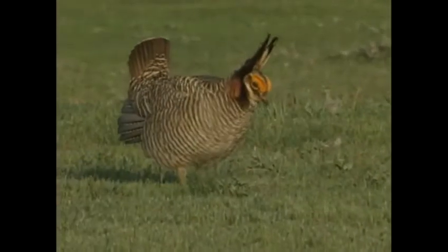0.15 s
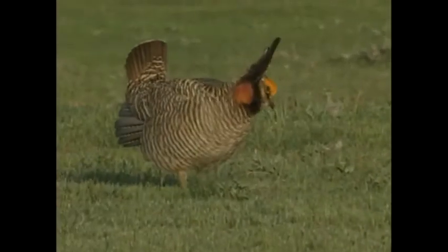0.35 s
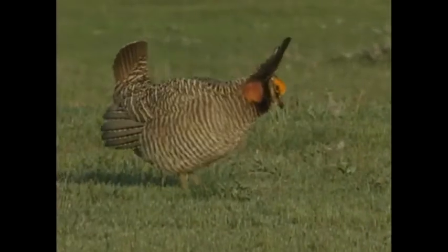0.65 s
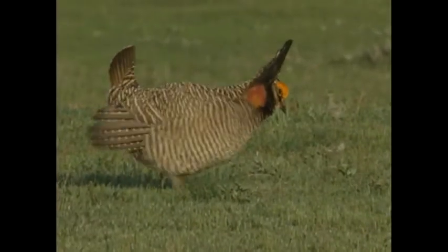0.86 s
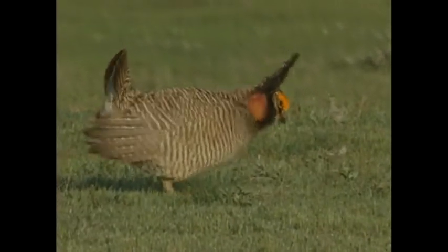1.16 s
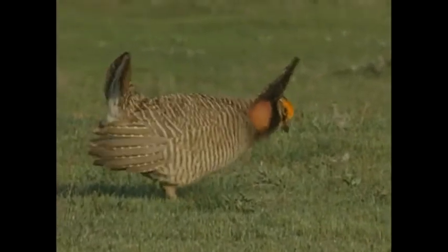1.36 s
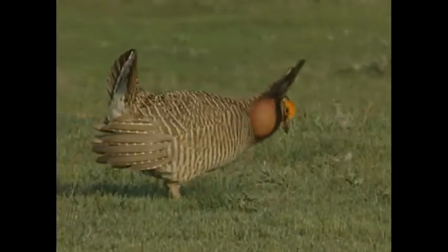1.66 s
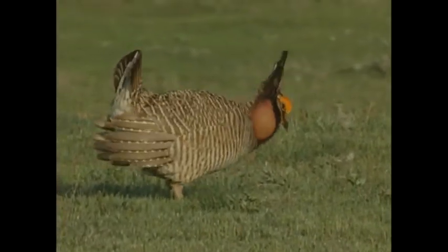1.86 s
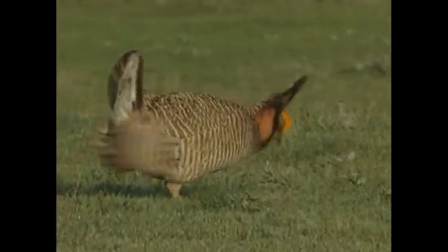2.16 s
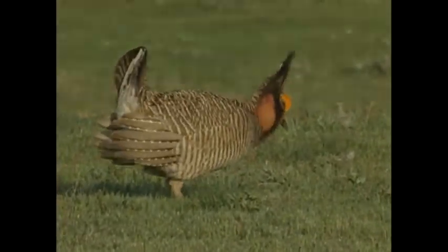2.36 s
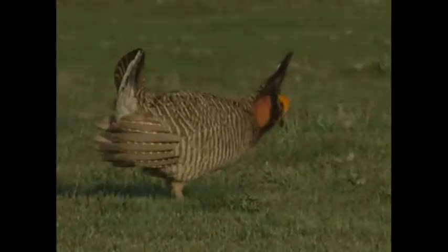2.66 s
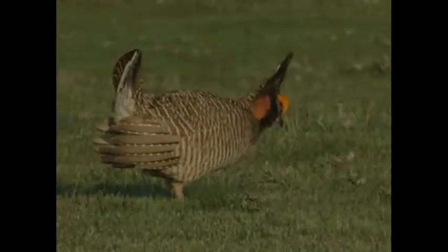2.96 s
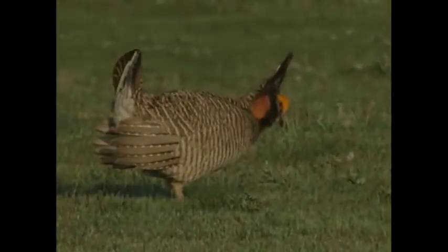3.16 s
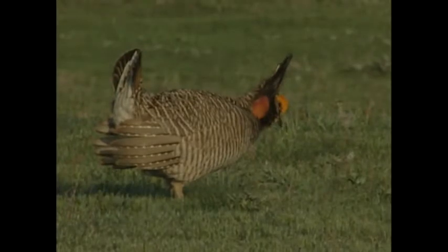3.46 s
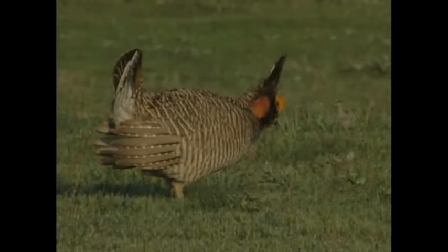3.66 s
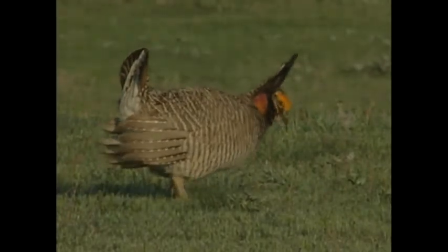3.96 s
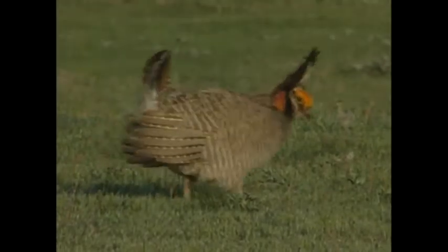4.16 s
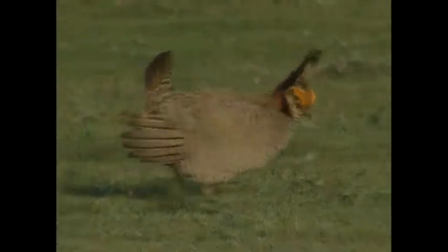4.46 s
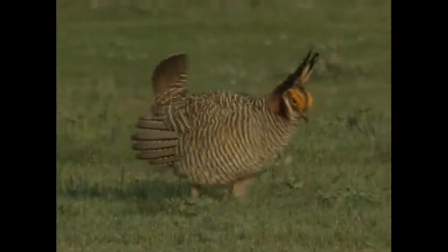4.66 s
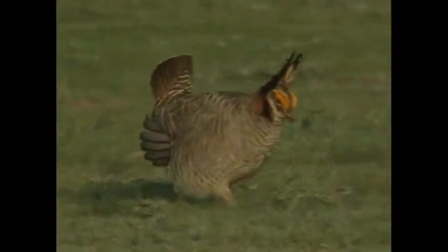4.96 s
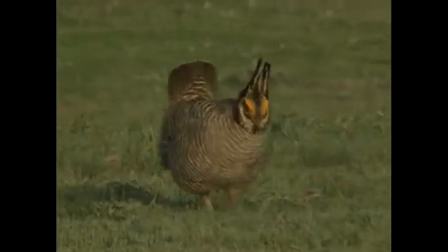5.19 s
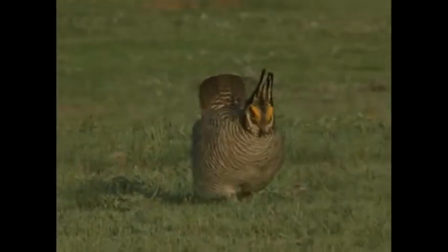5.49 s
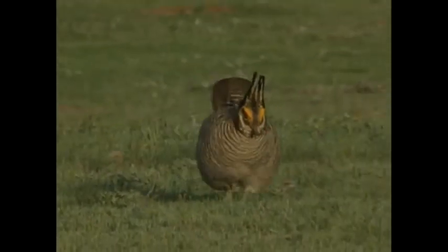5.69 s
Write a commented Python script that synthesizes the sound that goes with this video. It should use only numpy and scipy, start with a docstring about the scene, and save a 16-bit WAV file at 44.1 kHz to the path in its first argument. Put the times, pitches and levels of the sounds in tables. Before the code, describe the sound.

A near-mono field pickup with birds in the centre: throaty, bubbling grouse gobbles tumble quickly between low and higher notes, pausing around the middle while others hoot faintly far away, then resuming vigorously. A small bird adds brief, bright, rasping chirps at uneven gaps. Thin distant whistles flutter behind. Deep wind rumble and lumpy microphone buffeting sit under even grassland hiss, peaking in a gust during the last cackle.

```python
"""Prairie chickens on open grassland

Bubbling cackles sound close by, a fainter cackle and random hoots further off. All their notes are one
source-filter voice: a nearly pure tone that flips registers through a throat resonance near 700 Hz.
A small bird repeats a harmonic-rich, arched peep, and a far songbird whistles sliding sines.
Shaped noise makes the wind that rumbles on a microphone and the even hush of the field."""
import sys
import numpy as np
from scipy import signal
from scipy.fft import rfft, irfft, next_fast_len
from scipy.io import wavfile
from scipy.ndimage import uniform_filter1d

SR = 44100
rng = np.random.default_rng(int(sys.argv[2]) if len(sys.argv) > 2 else 0)


def master(y):
    """Save y as 16-bit WAV."""
    cut = np.clip(np.atleast_2d(y).T, -1, 1)
    pcm = np.round(cut * 32767)  # scale
    wavfile.write(sys.argv[1], SR, pcm.astype(np.int16))


N = 257103
TIME = np.arange(N) / SR  # s


def undb(db):
    """Level to amplitude: 20 dB is a factor of ten."""
    return 10 ** (np.asarray(db) / 20)


def response(points, hz):
    """Filter gain at hz, interpolated in dB over log frequency between (f/Hz, level/dB) points."""
    corner_hz, db = np.transpose(points)
    return undb(np.interp(np.log(np.maximum(hz, 1)), np.log(corner_hz), db))


def coloured(x, points):
    """Linear filtering: the spectrum of x is multiplied by a (f/Hz, level/dB) outline."""
    size = next_fast_len(N)
    hz = np.arange(size // 2 + 1) * SR / size
    return irfft(rfft(x, size) * response(points, hz), size)[:N]


def noise(points):
    """Filtered white noise, scaled to rms 1."""
    x = coloured(rng.standard_normal(N), points)
    return x / x.std()


def steadied(x, span_s):
    """Level equalisation: noise divided by its running rms, which evens out the slow swells."""
    return x / np.sqrt(uniform_filter1d(x ** 2, int(span_s * SR)) + 1e-9)


def walk(rate, size=N):
    """Smoothed random modulation with a spread near 0.6, drawn anew rate times a second."""
    k = max(int(SR / rate), 1)
    steps = np.repeat(rng.standard_normal(size // k + 1), k)
    return 0.71 * uniform_filter1d(steps, k)[:size]


def window(t, start, end, edge):
    """Sine-squared gating: one between start and end, with rounded edges."""
    ramp = np.clip(np.minimum(t - start, end - t) / edge, 0, 1)
    return np.sin(np.pi / 2 * ramp) ** 2


def wind(buffet_db=-1, rumble_db=-56.0, coupling=0.24, ceiling_db=-44.5):
    """Flow noise: lumpy buffeting on the microphone, a low rumble tied to it, a stronger, brighter gust."""
    # buffeting force before the ceiling: t/s, level/dB
    force_course = [(0.0, -63), (0.26, -54.5), (0.31, -68), (0.39, -49.5), (0.53, -71), (0.62, -51),
                    (0.88, -76), (0.89, -48.5), (1.18, -76.5), (1.35, -63.5), (1.96, -68.5), (2.19, -50),
                    (2.55, -48), (2.6, -60.5), (2.92, -60), (2.95, -54), (3.77, -65.5), (4.34, -65),
                    (4.64, -38), (4.82, -48.5), (4.93, -65), (4.98, -46.5), (5.18, -63), (5.28, -52),
                    (5.33, -69), (5.38, -44), (5.62, -51.5), (5.63, -51.5), (5.76, -54), (5.83, -52)]
    # the strong gust: t/s, level/dB
    gust_course = [(4.52, -67), (4.536, -39), (4.63, -43), (4.735, -36.5), (4.77, -62), (4.805, -40),
                   (4.85, -63)]
    # spectra of buffeting, rumble and gust: f/Hz, level/dB
    buffet_colour = [(12, -10.5), (25, -6), (42, -2.5), (65, -1.5), (85, -1.5), (140, -41), (300, -65.5)]
    rumble_colour = [(45, -18), (75, -7.5), (102, 2), (125, -7), (150, -23), (300, -72.5)]
    gust_colour = [(20, -29), (45, 3.5), (75, 0), (120, 2), (160, -16), (210, -15.5), (280, -43),
                   (600, -76)]

    force_db = np.minimum(np.interp(TIME, *np.transpose(force_course)), ceiling_db)
    buffeting = undb(force_db + buffet_db) * steadied(noise(buffet_colour), span_s=0.083)
    swell_db = coupling * (force_db - force_db.mean())
    rumble = undb(rumble_db + swell_db) * steadied(noise(rumble_colour), span_s=0.22)
    gust_s, gust_db = np.transpose(gust_course)
    gust = undb(np.interp(TIME, gust_s, gust_db)) * steadied(noise(gust_colour), span_s=0.041)
    return buffeting + rumble + gust * window(TIME, gust_s[0], gust_s[-1], 0.0044)


def field(level_db=-64):
    """Stationary noise: the even hush of open country, running into microphone hiss."""
    # spectrum of the hush: f/Hz, level/dB
    field_colour = [(30, 4.5), (150, -9.5), (200, 1.5), (280, -3.5), (400, -8.5), (600, -14), (1000, -20),
                    (1700, -22.5), (3000, -25), (6000, -25.5), (12000, -26)]
    return noise(field_colour) * undb(level_db)


def songbird(flutter_db=2):
    """Frequency and amplitude modulation: far whistles slide, level off and flutter in the moving air."""
    # notes: start t/s, length t/s, first pitch f/Hz, last pitch f/Hz, level before the flutter/dB
    whistles = [(0.087, 0.055, 2420, 2210, -80), (1.551, 0.05, 5480, 5820, -71.5),
                (2.119, 0.03, 4860, 5100, -70.5), (2.808, 0.09, 2740, 2626, -72.5),
                (2.96, 0.186, 3355, 3266, -75), (3.245, 0.083, 2100, 2040, -69),
                (3.436, 0.051, 3350, 2790, -75.5), (3.619, 0.1, 2227, 2170, -85),
                (3.742, 0.056, 1744, 1790, -65), (4.701, 0.13, 2570, 2453, -74.5),
                (4.908, 0.22, 1770, 1630, -74), (5.302, 0.14, 2190, 2050, -73),
                (5.517, 0.074, 3000, 2750, -77.5), (5.805, 0.039, 2430, 2254, -69)]
    out = np.zeros(N)
    flutter = undb(flutter_db * walk(40))
    for start, length, first_hz, last_hz, db in whistles:
        on = (TIME >= start) & (TIME < start + length)
        t = TIME[on] - start
        hz = last_hz + (first_hz - last_hz) * (1 - t / length) ** 1.8
        phase = 2 * np.pi * np.cumsum(hz) / SR
        out[on] += undb(db) * window(t, 0, length, 0.017) * np.sin(phase)
    return out * flutter


def peep(start, length, top_hz, db, tilt_db, jitter=0.0039, slip_rise=0.1, slip_dip=0.24, rasp=0.3, count=6):
    """Additive synthesis of an arched chirp; the membrane slips now and then, which makes it rasp."""
    # course of the chirp: share of its length, pitch over top pitch, level/dB
    peep_shape = [(0, .82, -15.5), (0.129, .92, -6), (.25, 1, 1.5), (.48, 0.99, 2), (.7, 1, -1),
                  (.88, 0.94, -1), (1, 0.833, -16)]
    on = (TIME >= start) & (TIME < start + length)
    t = TIME[on] - start
    share, arch, swell_db = np.transpose(peep_shape)

    # each slip is a brief bump that raises the pitch and dips the level
    when, size = rng.uniform((.2, .4), (.8, 1), (count, 2)).T[:, :, None]
    slip = (size * np.exp(-.5 * ((t - when * length) / .0005) ** 2)).max(axis=0)
    hz = top_hz * np.interp(t / length, share, arch)
    unsteady = 1 + slip_rise * slip + jitter * walk(1800)[on]
    phase = 2 * np.pi * np.cumsum(hz * unsteady) / SR

    # six harmonics flicker from cycle to cycle, the upper ones most
    k = np.arange(1, 7)[:, None]
    flicker = 1 + rasp * k / 2 * np.array([walk(2000)[on] for _ in k])
    tilt = undb(tilt_db * np.maximum(k - 2, 0))
    tone = np.sum(flicker * tilt * np.sin(k * phase), axis=0)
    level = undb(db + np.interp(t / length, share, swell_db)) * (1 - min(slip_dip, 1) * slip)
    out = np.zeros(N)
    out[on] = tone * level * window(t, 0, length, 0.00038)
    return out


def small_bird():
    """Source-filter principle: chirps rich in harmonics are coloured by the windpipe and beak."""
    # peeps: start t/s, length t/s, top pitch f/Hz, source level/dB, tilt per harmonic above the second/dB
    peeps = [(.134, 0.054, 1927, -42, 3.5), (.659, 0.055, 1921, -43, -0.5), (1.907, 0.054, 1872, -51.5, 2),
             (3.308, 0.055, 1854, -44, 1), (4.075, 0.053, 1888, -44, -3.5), (4.731, 0.053, 1878, -45, 1),
             (5.162, 0.054, 1893, -43, 1), (5.617, 0.051, 1856, -44.5, 2.5)]
    # windpipe and beak: f/Hz, level/dB
    peep_colour = [(1900, -27.5), (2900, -9.5), (3400, -8), (3850, 0), (4250, 1), (4650, -10.5),
                   (5700, -6.5), (6400, -7.5), (7100, -16), (7800, -21), (8700, -27.5), (10000, -46.5),
                   (11300, -34.5), (12500, -92)]
    return coloured(sum(peep(*row) for row in peeps), peep_colour)


def ring_on(envelope):
    """First-order lag: the air sacs take milliseconds to fill with sound and to let it go."""
    keep = np.exp(-1 / (.002 * SR))  # time constant 2 ms
    return signal.lfilter([1 - keep], [1, -keep], envelope)


def cackle(start, pitch, drive_db, purest_db, jitter=0.017, shimmer_db=2.4, second_db=-7, third_db=-29,
           low_register_hz=400, purity_octaves=0.4, usual_drive_db=-39, clearing=0.69):
    """Source-filter principle: harmonics of a sliding tone light up as they cross the throat resonance."""
    # the voice cracks and adds the octave below: start t/s, end t/s, level against the drive/dB
    cracks = [(0.465, 0.514, 8), (4.673, 4.692, 3), (4.714, 4.74, 3)]
    # throat and air sacs: f/Hz, level/dB
    throat = [(250, -79.5), (400, -8.5), (500, -4.5), (600, 0.5), (750, 1.5), (850, -1.5), (1000, -15),
              (1150, -9.5), (1600, -31.5), (2500, -29)]
    size, first = len(pitch), int(start * SR)
    t = TIME[first:first + size]
    hz = pitch * (1 + jitter * walk(250, size=size))
    phase = 2 * np.pi * np.cumsum(hz) / SR

    # the low register is rich; the high one is nearly a sine, and purer the harder it is driven
    high_db = np.minimum(purest_db - clearing * (drive_db - usual_drive_db), 0)
    height = np.clip(np.log2(hz / low_register_hz) / purity_octaves, 0, 1)
    rich_db = high_db * height
    cracked = sum(undb(db) * window(t, begin, end, 0.0017) for begin, end, db in cracks)
    partials = [(.5, cracked), (1, 1), (2, undb(second_db + rich_db)), (3, undb(third_db + rich_db))]

    push = undb(drive_db + shimmer_db * walk(175.7, size=size))
    tone = 0
    for k, gain in partials:
        envelope = ring_on(push * gain * response(throat, k * hz))
        tone = tone + envelope * np.sin(k * phase)
    return np.pad(tone * window(t, t[0], t[-1], 0.0026), (first, N - first - size))


def hoot(start, length, first_hz, last_hz, db, purest_db):
    """Frequency glide: a slightly arched slide that swells to a late peak."""
    peak_share, onset_db, end_db = 0.7, -10, -12  # levels against the peak drive
    arch_depth = 0.02  # share of the pitch
    share = TIME[:int(length * SR)] / length
    swell_db = np.interp(share, [0, peak_share, 1], [onset_db, 0, end_db])
    arch = 1 + arch_depth * (np.sin(np.pi * share) - .5)
    pitch = (first_hz + (last_hz - first_hz) * share) * arch
    return cackle(start, pitch, db + swell_db, purest_db)


def whoop(start, length, leap_s, first_hz, top_hz, last_hz, leap_db, hold_db, fall_db, purest_db=-12):
    """Register change: the voice leaps up, thins on a slowly sagging top and gains body as it falls."""
    fall_s, glide_bend = 0.0203, 1.546  # length of the fall, exponent of both glides
    hold_sag = 0.09  # share of the top pitch lost over the note
    # loudest at this share of the leap and this long before the end; the ends are weaker
    leap_peak, fall_peak_s, edge_db = 0.23, 0.0061, -5
    t = TIME[:int(length * SR)]
    top = top_hz * (1 - hold_sag * (t / length - .5))
    leap = np.maximum(1 - t / leap_s, 0) ** glide_bend
    fall = np.maximum(1 - (length - t) / fall_s, 0) ** glide_bend
    pitch = top + (first_hz - top) * leap + (last_hz - top) * fall
    turns = np.sort([0, leap_peak * leap_s, leap_s, length - fall_s, length - fall_peak_s, length])
    levels_db = [leap_db + edge_db, leap_db, hold_db, hold_db, fall_db, fall_db + edge_db]
    return cackle(start, pitch, np.interp(t, turns, levels_db), purest_db)


def drone(start, length, hz, db, lift_db, purest_db):
    """Drive modulation: a soft held note swells and sags, then lifts with a second push."""
    sag, lift_rise, lift_s = 0.099, 0.39, 0.028  # shares of the pitch lost and regained; length of the lift
    onset_db, dip_db, end_db = -14, -4.5, -15
    t = TIME[:int(length * SR)]
    held = length - lift_s
    lift = np.maximum((t - held) / lift_s, 0) ** 2
    pitch = hz * (1 - sag * t / length + lift_rise * lift)
    turns = [0, held / 2, held, held + lift_s / 2, length]
    levels_db = [db + onset_db, db, db + dip_db, lift_db, lift_db + end_db]
    return cackle(start, pitch, np.interp(t, turns, levels_db), purest_db)


def yelp(break_s, low_s, top_hz, high_db, low_db, purest_db=-9):
    """Register break: a short high cry collapses exponentially into the low register, rich in overtones."""
    rise_s, from_share, onset_db = .016, 0.865, -15  # it starts at this share of its top pitch
    drop_s, low_hz, low_sag = 0.00453, 416, 0.146  # time constant of the drop, where to, share it then sags
    dip_db, end_db = -4, -4
    t = TIME[:int((rise_s + low_s) * SR)] - rise_s
    high = top_hz * np.interp(t, [-rise_s, 0], [from_share, 1])
    low = low_hz * (1 - low_sag * t / low_s)
    pitch = low + (high - low) * np.exp(-np.maximum(t, 0) / drop_s)
    turns = [-rise_s, -rise_s / 2, 0, drop_s, low_s / 2, low_s]
    levels_db = [high_db + onset_db, high_db, high_db, low_db + dip_db, low_db, low_db + end_db]
    return cackle(break_s - rise_s, pitch, np.interp(t, turns, levels_db), purest_db)


def flock(count=16, purest_db=-15):
    """Random superposition: birds further off hoot in the lull, each note with its own pitch and slide."""
    from_s, to_s, note_s = 2.9, 3.8, 0.071
    mid_db, spread_db, mid_hz, slide = -70, 4, 562, 0.197  # slide as a share of the pitch
    out = 0
    for when, first, last, loud in rng.uniform(-1, 1, (count, 4)):
        start = np.interp(when, [-1, 1], [from_s, to_s])
        first_hz, last_hz = mid_hz * (1 + slide * first), mid_hz * (1 + slide * last)
        out = out + hoot(start, note_s, first_hz, last_hz, mid_db + spread_db * loud, purest_db)
    return out


def prairie_chickens():
    """Superposition: the close birds' cackles and a fainter far cackle are added to the random far hoots."""
    # hoots: start t/s, length t/s, first f/Hz, last f/Hz, drive/dB, overtones/dB
    hoots = [(0.407, 0.036, 658, 527, -37.5, -12), (0.439, 0.016, 738, 712, -41, -10),
             (0.532, 0.045, 427, 549, -28, -11.5), (0.568, 0.042, 638, 665, -32.5, -15),
             (0.701, .022, 687, 698, -40, -12), (1.152, 0.062, 481, 530.5, -32, -26),
             (1.203, 0.036, 520, 667, -43, -20), (1.246, 0.015, 662, 487, -34, -18),
             (1.266, 0.018, 449, 484, -37, -17), (1.283, 0.019, 502, 530, -30, -16),
             (1.302, 0.021, 570, 391, -38.5, -18), (1.303, 0.032, 610, 735, -49.5, -18),
             (1.327, .045, 543, 582, -38.5, -19), (1.89, 0.049, 450, 588, -57, -17),
             (2.015, 0.031, 460, 533, -59, -17), (2.046, 0.056, 773, 803, -61.5, -17),
             (2.101, 0.025, 669, 520, -37, -6.5), (2.133, 0.057, 412, 533, -34.5, -22),
             (2.228, 0.034, 417, 396, -34.5, -14), (2.23, .038, 883, 482, -29.5, -15),
             (2.265, 0.034, 472, 565, -27, -22), (2.293, .034, 715, 528, -36, -18),
             (2.33, 0.046, 881, 910, -36.5, -17), (2.402, .029, 513, 670, -29, -21),
             (2.428, 0.017, 680, 765, -35, -22), (2.496, .120, 687, 642, -52, -24),
             (3.175, 0.083, 422, 520, -49, -42), (3.261, .035, 437, 507, -48.5, -32),
             (3.394, 0.02, 556, 690, -56, -19), (3.459, 0.07, 543, 444, -55.5, -26),
             (3.657, 0.055, 486, 553, -62, -17), (4.642, 0.022, 539, 515, -34, -6),
             (4.792, 0.02, 566, 710, -37.5, -14), (4.85, 0.022, 702, 760, -48.5, -14),
             (4.941, 0.028, 540, 664, -30, -18), (4.964, 0.026, 703, 726, -29, -18),
             (4.994, 0.033, 557, 524, -35.5, -17), (5.02, 0.021, 610, 767, -35.5, -18),
             (5.121, 0.038, 565, 572, -43.5, -17)]
    # whoops: start t/s, length t/s, length of the leap t/s, first f/Hz, top f/Hz, last f/Hz,
    # drive of the leap/dB, of the hold/dB, of the fall/dB
    whoops = [(.432, 0.097, 0.012, 560, 790, 442, -38.5, -56, -31),
              (.607, 0.11, 0.017, 690, 781, 450, -47.5, -44.5, -38),
              (.732, .089, .022, 342, 588, 373, -37, -41, -45),
              (0.821, 0.06, 0.029, 592, 675, 466, -50, -38.5, -46.5),
              (1.34, 0.072, .020, 491, 836, 345, -40.5, -54, -39.5),
              (1.415, 0.11, 0.033, 386, 824, 400, -39.5, -45, -45),
              (1.538, 0.089, 0.03, 366, 825, 363, -39, -39, -46),
              (1.662, 0.063, 0.028, 377, 765, 596, -44.5, -40, -53.5),
              (1.929, 0.067, .014, 560, 820, 760, -61, -71, -73),
              (2.121, 0.056, 0.012, 527, 801, 650, -34.5, -47.5, -51),
              (2.175, 0.03, 0.022, 490, 963, 930, -31.5, -37.5, -50),
              (2.196, 0.041, 0.013, 728, 786, 410, -51, -50, -36.5),
              (2.296, .034, .008, 760, 962, 727, -40, -29, -34.5),
              (2.333, 0.067, 0.0331, 526, 816, 556, -34.5, -44, -39.5),
              (3.322, .066, 0.029, 410, 725, 420, -55, -72, -67),
              (4.658, .055, 0.0095, 520, 817, 506, -37.5, -48.5, -36.5),
              (4.713, .045, 0.012, 620, 794, 420, -45, -51.5, -32),
              (4.764, 0.035, 0.019, 454, 799, 500, -31, -49.5, -36),
              (4.813, 0.045, 0.023, 448, 767, 600, -30, -48, -37),
              (4.877, 0.059, 0.0273, 542, 827, 600, -33.5, -45, -36)]
    # drones: start t/s, length t/s, pitch f/Hz, drive/dB, drive of the lift/dB, overtones/dB
    drones = [(.880, .046, 515, -45.5, -49.5, -5), (1.041, 0.094, 566, -61, -58, -17),
              (1.705, 0.11, 577, -47, -51, -28), (2.505, 0.12, 572, -44.5, -31, -13),
              (2.721, .111, 556, -45.5, -38, -10), (5.261, .108, 548, -46.5, -40, -12)]
    # yelps: break t/s, length of the low part t/s, top f/Hz, drive before/dB, drive after/dB
    yelps = [(.945, 0.031, 754, -44, -42), (1.827, 0.027, 732, -53.5, -46),
             (2.472, 0.03, 761, -33.5, -40.5), (2.645, 0.0352, 811, -36, -39),
             (2.855, 0.027, 769, -37.5, -41), (3.757, 0.056, 816, -64, -59),
             (5.057, .028, 798, -33.5, -38.5), (5.194, 0.041, 747, -32, -36),
             (5.399, 0.03, 752, -39.5, -41)]
    calls = [(hoot, hoots), (whoop, whoops), (drone, drones), (yelp, yelps)]
    return sum(note(*row) for note, rows in calls for row in rows) + flock()


def scatter(x, db, t60):
    """Diffuse scattering: the brief, weak tail that grass and uneven ground send back."""
    t = TIME[:SR // 2]
    decay = np.exp(-np.log(1000) * t / t60)  # falls by 60 dB in t60 seconds
    tail = rng.standard_normal(len(t)) * decay * (t > .005)
    return undb(db) * signal.fftconvolve(x, tail / np.sqrt(np.sum(tail ** 2)))[:N]


def scene():
    """Superposition: birds and wind in the centre; a trace of hiss in antiphase between the channels."""
    song = songbird()
    peeps = small_bird()
    chickens = prairie_chickens()
    tails = scatter(chickens, db=-15, t60=0.068)
    tails += scatter(peeps, db=-24, t60=0.091)
    tails += scatter(song, db=-10.0, t60=0.15)
    side = undb(-89) * rng.standard_normal(N)
    return chickens + peeps + song + tails + wind() + field() + np.array([side, -side])


def record(dry):
    """Band limitation: the recorder's steep low-pass cuts the top."""
    top_hz = 12450
    low_pass = signal.ellip(10, .1, 70, top_hz, fs=SR, output="sos")
    return signal.sosfilt(low_pass, dry)


dry = scene()
out = record(dry)
master(out)
```